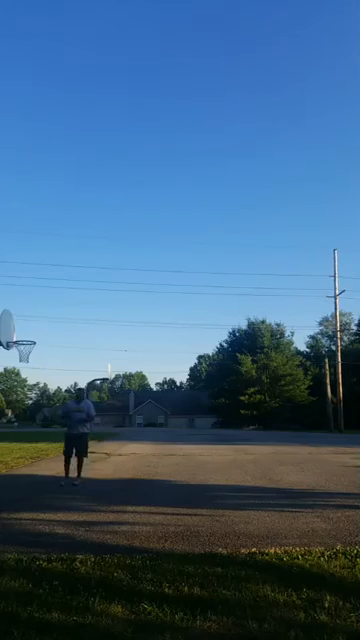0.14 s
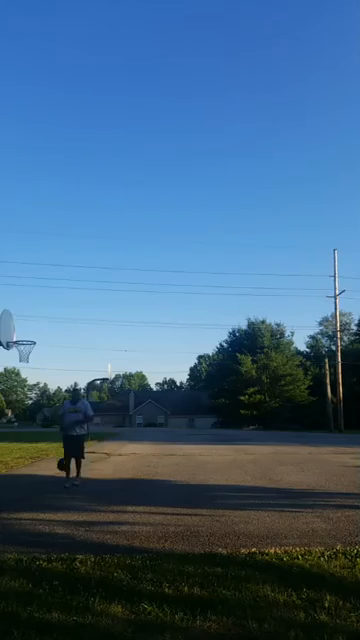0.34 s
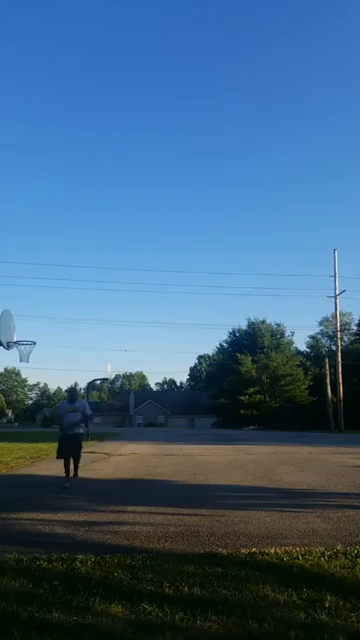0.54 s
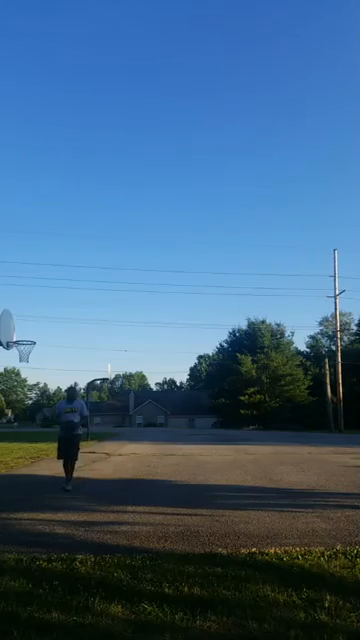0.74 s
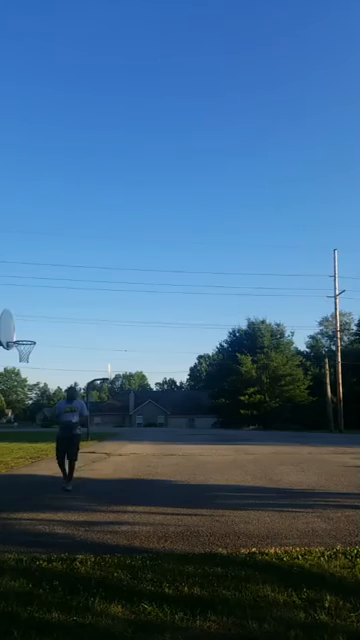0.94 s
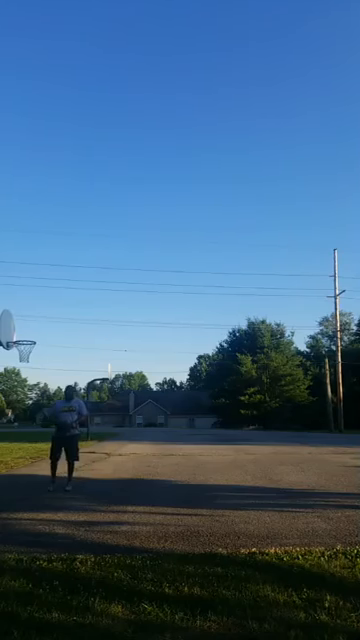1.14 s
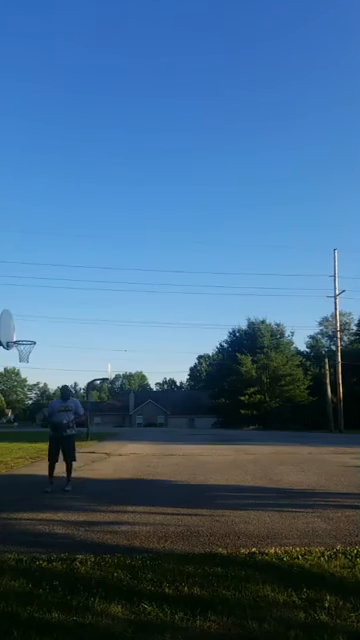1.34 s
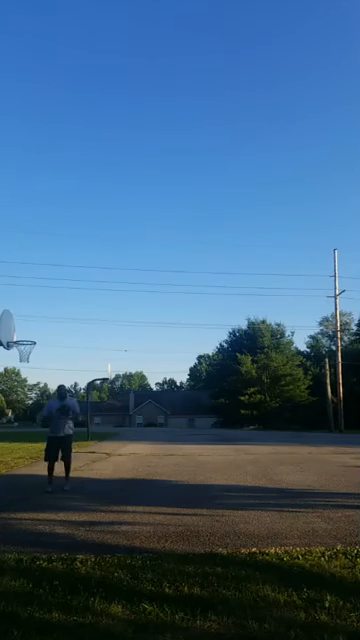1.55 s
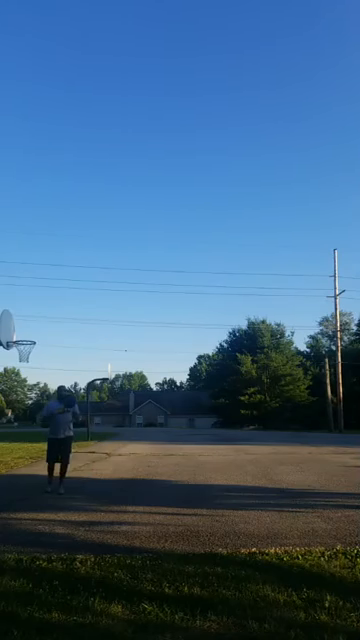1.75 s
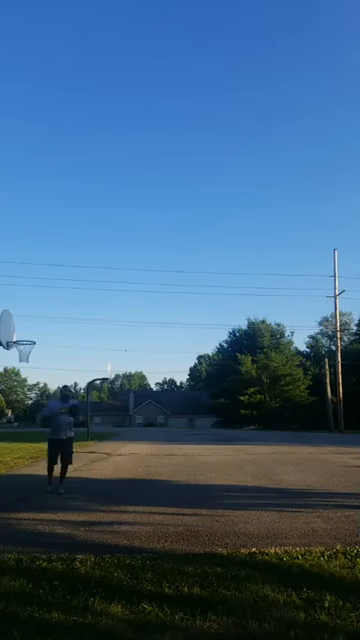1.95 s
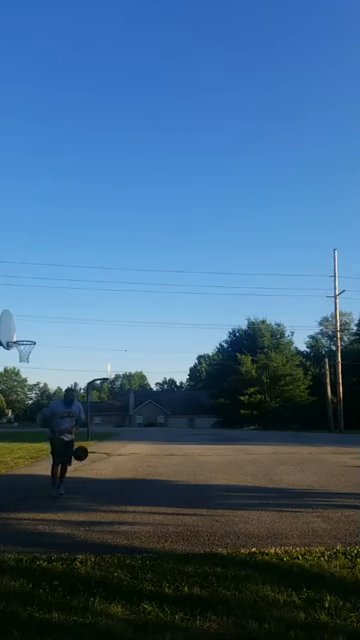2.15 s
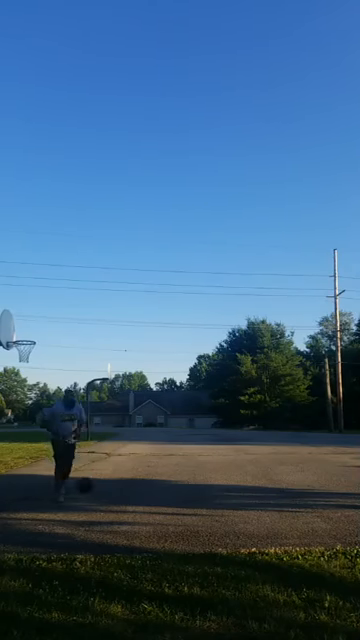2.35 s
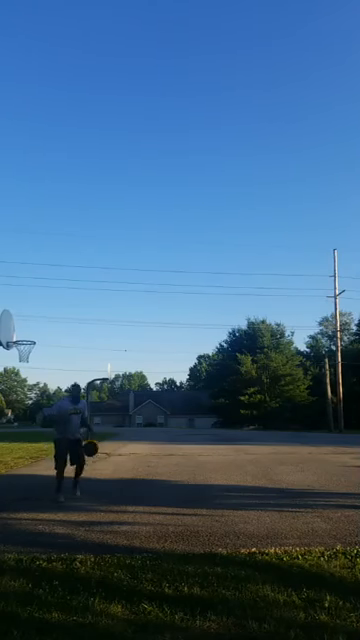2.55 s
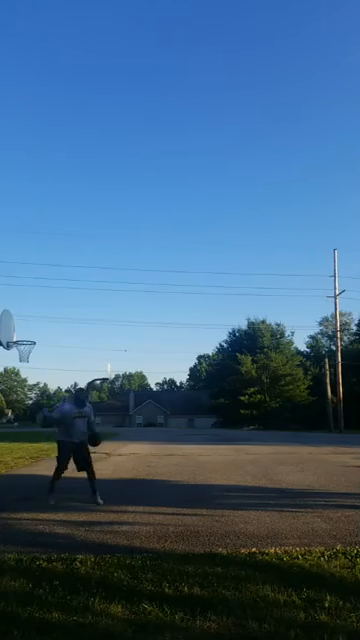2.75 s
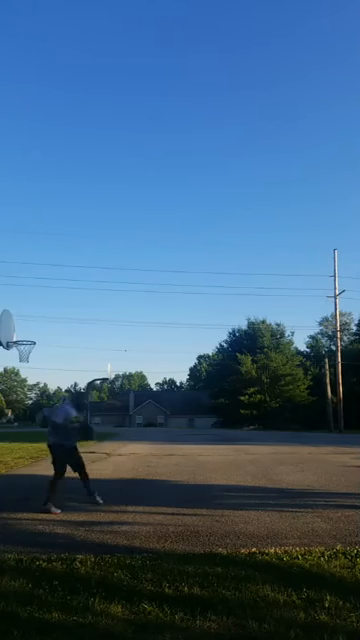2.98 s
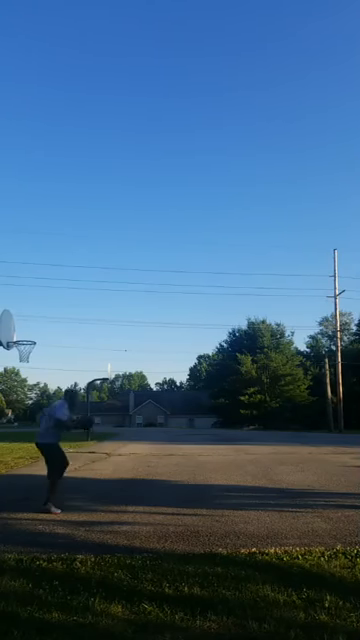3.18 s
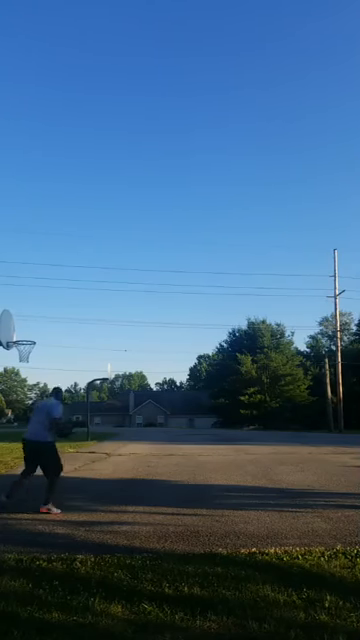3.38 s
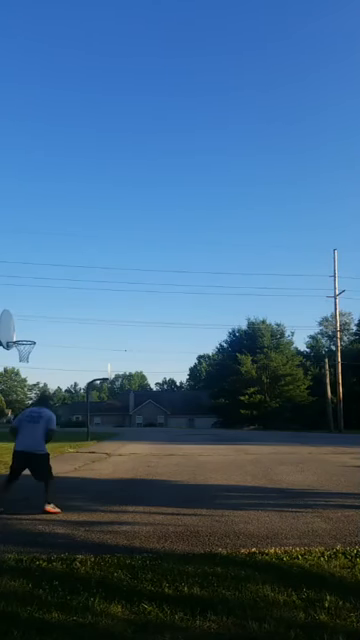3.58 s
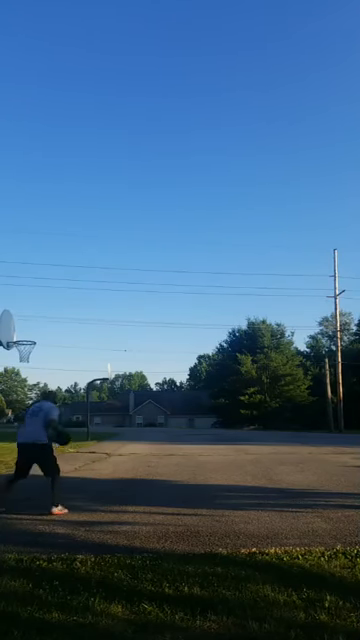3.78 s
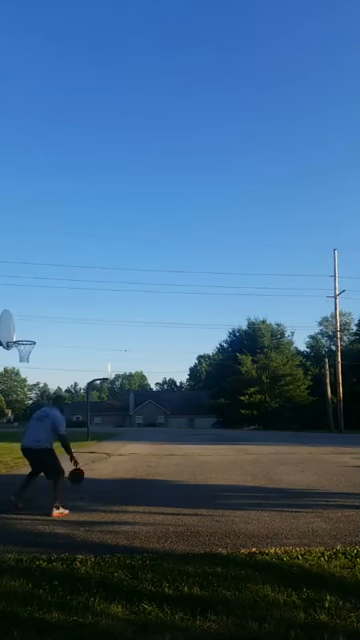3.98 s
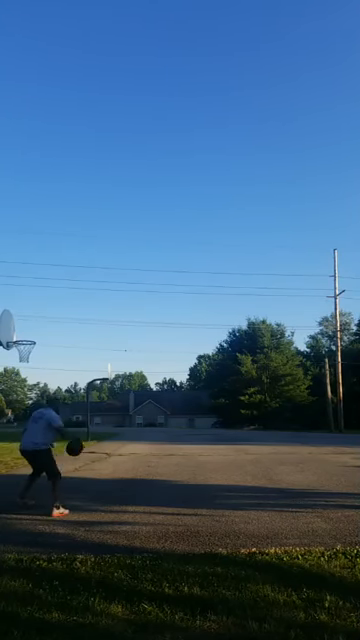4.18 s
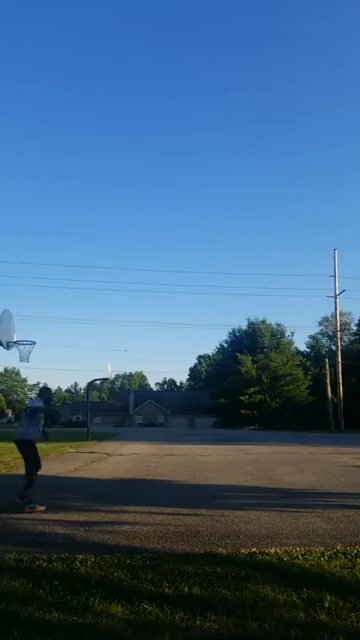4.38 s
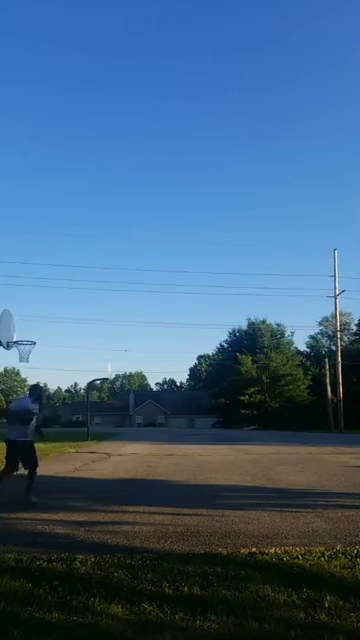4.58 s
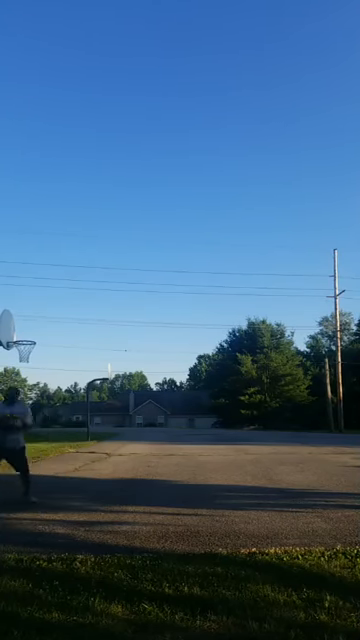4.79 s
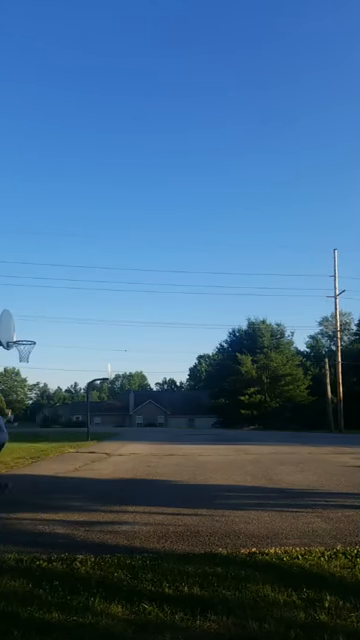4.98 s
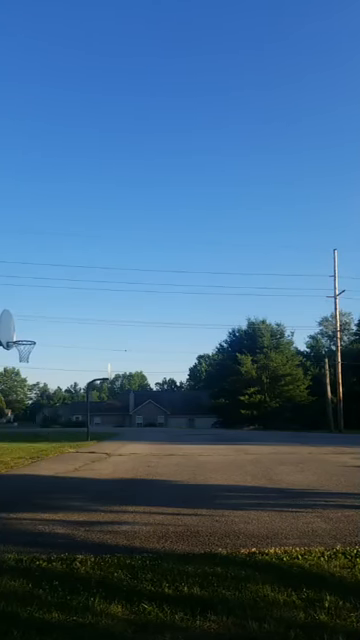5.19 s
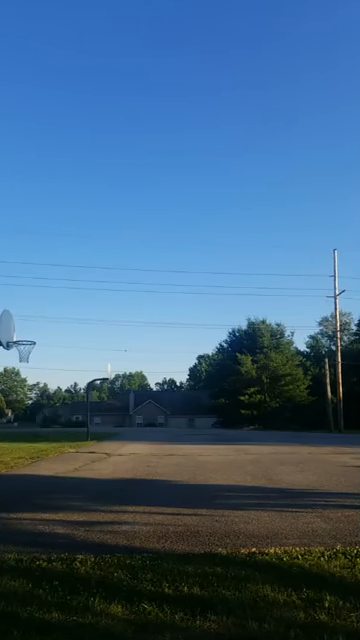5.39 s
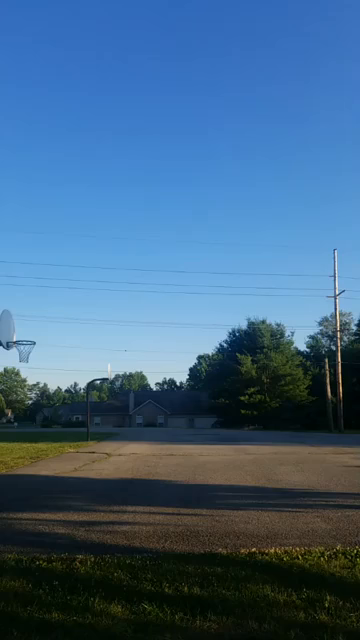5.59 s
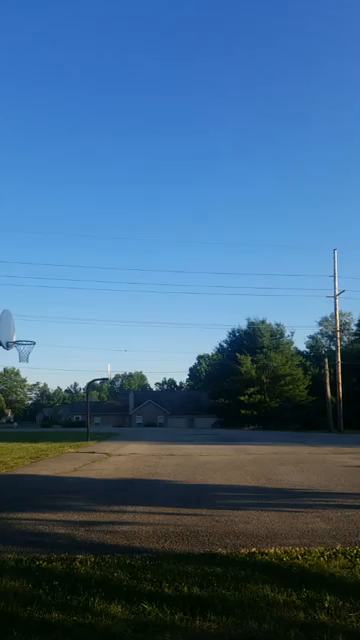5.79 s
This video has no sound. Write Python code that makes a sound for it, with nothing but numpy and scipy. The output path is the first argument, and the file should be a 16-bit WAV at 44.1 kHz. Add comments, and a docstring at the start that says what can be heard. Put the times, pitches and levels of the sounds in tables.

```python
"""A basketball dribbled on an open asphalt court, some metres from a phone standing in the grass.
Each of the three bounces thumps as the ball flattens, and its shell and the air inside ring briefly.
Between bounces, shoes scuff over loose grit, snap small stones, judder and stamp.
Far off, birds whistle and buzz over a traffic rumble and the hiss of leaves and insects.
Trees and houses send back faint echoes; a ground reflection and the mono microphone colour the sound."""
import sys
import numpy as np
from scipy import signal
from scipy.fft import rfft, irfft
from scipy.io import wavfile
from scipy.ndimage import uniform_filter1d

SR = 44100
rng = np.random.default_rng(int(sys.argv[2]) if len(sys.argv) > 2 else 0)


def dump_mix(stems):
    """Bounce the given channels to the path in sys.argv[1] as a 16-bit WAV at rate SR."""
    frames = np.atleast_2d(stems).T  # one column per channel
    limited = np.clip(frames, -1, 1)  # hard clip at full scale
    pcm = np.round(limited * 32767).astype(np.int16)
    wavfile.write(sys.argv[1], SR, pcm)


N = 257103
T = np.arange(N) / SR

# spectrum of loose grit on asphalt: f/Hz, level/dB
GRIT = [(300, -29.5), (900, -9.5), (1700, 10), (2800, 6), (4200, 2.5), (7000, -4.5), (14000, -22.5)]
# spectrum of a rubber sole's dull body: f/Hz, level/dB
SOLE = [(70, -14), (200, -2.5), (450, -5), (800, -1.5), (1200, -1.5), (2000, -4.5), (5000, -33)]


def undb(db):
    """Decibels to gain."""
    return 10 ** (np.asarray(db) / 20)


def unit(x):
    """Scale to rms 1."""
    return x / np.sqrt(np.mean(x ** 2))


def add(out, s, x):
    """Mix x into out from time s."""
    i = int(s * SR)
    out[i:i + len(x)] += x[:max(N - i, 0)]


def colour(x, points, tilt_db=0, size=8192):
    """Causal filter through (f/Hz, level/dB) points, tilted by tilt_db per octave around 3 kHz."""
    hz, db = np.transpose(points)
    octave = np.log2(np.fft.rfftfreq(size, 1 / SR) + 1)
    slope = tilt_db * np.clip(octave - np.log2(3000), -2, 2)
    gain = undb(np.interp(octave, np.log2(hz), db) + slope)
    # folding the cepstrum gives minimum phase
    cepstrum = irfft(np.log(gain))
    cepstrum[1:size // 2] *= 2
    cepstrum[size // 2 + 1:] = 0
    return signal.fftconvolve(x, irfft(np.exp(rfft(cepstrum))))[:len(x)]


def fade(t, t60):
    """Exponential decay, 60 dB down after t60 seconds."""
    return np.exp(-np.log(1000) * t / t60)


def ring(t, modes, tuning=1):
    """Damped sines that start together; tuning scales their frequencies."""
    return sum(undb(db) * fade(t, t60) * np.sin(2 * np.pi * hz * tuning * t) for hz, db, t60 in modes)


def walk(rate_hz):
    """Smooth random wander with rms 1."""
    hold = int(SR / rate_hz)
    steps = np.repeat(rng.standard_normal(N // hold + 1), hold)
    return unit(uniform_filter1d(steps, hold)[:N])


def grains(count, spread_db):
    """Dense tiny clicks, a few of them much larger than the rest."""
    sizes = undb(spread_db * np.minimum(rng.exponential(size=count), 5))
    return rng.standard_normal(count) * sizes * (rng.random(count) < 0.16)


def background(rumble_gain_db=4.5, hiss_gain_db=8, rumble_wander_db=0.94, hiss_wander_db=0.1):
    """Far traffic rumbles unevenly under the smooth hiss of leaves and insects."""
    # spectra of the traffic and the hiss: f/Hz, level/dB
    rumble_spectrum = [(20, -37), (40, -7), (65, -3), (120, 1), (170, -8.5), (230, -11.5), (320, -27),
                       (600, -25.5), (2000, -61)]
    hiss_spectrum = [(150, 4.5), (500, 7.5), (900, 5), (1700, 4.5), (2800, -4.5), (5000, 4.5), (7000, -6.5),
                     (9000, 4.5), (14000, -13)]
    # their rise and fall: t/s, level before gain/dB
    rumble_course = [(0.0, -60), (0.41, -59.5), (1.07, -62.5), (1.66, -62), (2.3, -57.5), (5.24, -59),
                     (5.83, -56.5)]
    hiss_course = [(0.0, -69.5), (0.28, -70.5), (0.5, -64), (0.89, -71.5), (1.59, -72.5), (1.88, -67.5),
                   (2.82, -66), (2.97, -62), (5.83, -68)]
    rumble_db = np.interp(T, *np.transpose(rumble_course)) + rumble_wander_db * walk(5.3)
    hiss_db = np.interp(T, *np.transpose(hiss_course)) - hiss_wander_db * walk(3.8)
    rumble = unit(colour(rng.standard_normal(N), rumble_spectrum))
    hiss = unit(colour(rng.standard_normal(N), hiss_spectrum))
    return undb(rumble_db + rumble_gain_db) * rumble + undb(hiss_db + hiss_gain_db) * hiss


def bird_buzzes(warble_hz=260, depth_rad=1.1):
    """A rapid warble of pitch splits each call into a stack of close lines that glide together."""
    # short buzzy calls: middle t/s, length/s, centre f/Hz, level/dB, rise/(Hz per s)
    calls = [(0.135, .08, 4730, -63, 11000), (0.273, 0.06, 5340, -57, 6000.5), (0.403, 0.089, 4270, -62, 0),
             (1.973, 0.16, 4070, -63, 1798)]
    out = np.zeros(N)
    for s, length, hz, db, rise in calls:
        on = abs(T - s) < length / 2
        t = T[on] - s
        glide = 2 * np.pi * (hz + rise * t / 2) * t
        warble = depth_rad * np.sin(2 * np.pi * warble_hz * t)
        out[on] += undb(db) * np.cos(np.pi * t / length) * np.sin(glide + warble)
    return out


def treetops(x, wet_db=-9, t60=1.35, build_s=0.036):
    """Foliage around the birds returns their song as a soft, late ring."""
    t = T[:SR]
    envelope = fade(t, t60) * np.minimum(t / build_s, 1)
    response = unit(rng.standard_normal(SR) * envelope) / np.sqrt(SR)
    return x + undb(wet_db) * signal.fftconvolve(x, response)[:N]


def scuffs(spread_db=3.5, swell_power=1.35):
    """A sole drags grit over the asphalt; pressure rises and falls, and the rubber adds a dull body."""
    # shoe slides: hardest pressure t/s, rise/s, fall/s, grit level/dB, tilt/(dB per octave)
    slides = [(.29, .04, 0.057, -56.5, 4.5), (.775, 0.039, .025, -55.5, 5), (1.235, .006, .04, -53, 10),
              (1.275, 0.048, 0.027, -46, 6), (1.763, 0.0042, 0.025, -53.5, 1),
              (1.783, 0.021, 0.021, -47.5, 3), (2.284, 0.024, 0.015, -52, 6.5),
              (2.774, 0.011, 0.019, -38, .5), (2.915, 0.075, 0.057, -34, 3),
              (3.123, 0.054, 0.033, -31.5, -2.5), (3.48, 0.14, 0.081, -42, 2.5),
              (3.759, .02, .025, -49.5, 6), (3.838, 0.025, 0.023, -40, 3), (4.501, 0.0053, 0.1, -45.5, 1.5),
              (4.617, .017, 0.025, -39, 0.5), (4.69, 0.086, 0.071, -42, 10.5),
              (4.9, 0.091, 0.044, -47.5, 3.5), (5.137, 0.023, 0.082, -30, -6),
              (5.21, 0.058, 0.059, -40, 1.5), (5.296, 0.051, 0.024, -46.5, 3),
              (5.48, .049, 0.037, -50.5, 1.5), (5.82, 0.12, .04, -54.5, 1)]
    out, t = np.zeros(N), T[:SR // 3] - T[SR // 7]
    for s, rise, fall, db, tilt_db in slides:
        pressure = np.interp(t, [-rise, 0, fall], [0, 1, 0]) ** swell_power
        grit = unit(colour(grains(len(t), spread_db), GRIT, tilt_db))
        sole = unit(colour(grains(len(t), spread_db), SOLE))
        sole_db = -8.5 - 0.31 * tilt_db  # a light, bright brush has less body
        add(out, s + t[0], undb(db) * pressure * (grit + undb(sole_db) * sole))
    return out


def surroundings(x, tail_db=-26, tail_t60=1.3, build_s=0.048, echo_smear_s=0.003, echo_hz=1200):
    """Ground, trees and houses return smeared echoes, then a thin long tail."""
    # broad scatter off nearby ground and grass, then a later, bright airy wash: delay/s, smear/s, level/dB,
    # centre f/Hz
    scatter = [(0.01, 0.018, -23, 805), (.055, 0.022, -23, 11100)]
    # echoes off houses and tree lines: delay/s, level/dB
    echoes = [(0.065, -35), (0.138, -36.5), (0.152, -51), (0.212, -46), (.265, -57.5), (0.319, -46)]
    # tail spectrum, raised at 1.2 kHz to cancel the dip applied in record(): f/Hz, level/dB
    tail_spectrum = [(80, -8.5), (250, -5.5), (700, -10.5), (950, -1.5), (1200, 11.5), (1700, -9),
                     (2300, 4), (3000, 0), (6000, -5.5), (14000, -2.5)]
    t = T[:SR]
    tail = colour(rng.standard_normal(SR), tail_spectrum) * fade(t, tail_t60)
    response = undb(tail_db) * unit(tail * np.minimum(t / build_s, 1))
    reflections = scatter + [(delay, echo_smear_s, db, echo_hz) for delay, db in echoes]
    for delay, smear, db, hz in reflections:
        band = [(hz / 8, -12), (hz / 2, -6), (hz, 0), (hz * 1.5, -11), (hz * 6, -20)]
        burst = rng.standard_normal(SR) * np.exp(-((t - delay) / smear) ** 2)
        response += undb(db) * unit(colour(burst, band))
    return signal.fftconvolve(x, response / np.sqrt(SR))[:N]


def snap(body_db, t60=0.011, rise_s=0.0009):
    """A short crackle with a dull body, as of one stone slipping under a sole; peak 1."""
    # spectrum of a stone's click: f/Hz, level/dB
    spectrum = [(300, -27), (900, -18.5), (1800, 5), (3000, 8), (4200, 2), (5500, -8), (7000, -7.5),
                (14000, -20.5)]
    t = T[:SR // 30]
    burst = rng.standard_normal((2, len(t))) * fade(t, t60) * (1 - np.exp(-t / rise_s))
    click = unit(colour(burst[0], spectrum)) + undb(body_db) * unit(colour(burst[1], SOLE))
    return click / np.max(abs(click))


def snaps(stones_per_s=140, jitter=0.25, scatter_db=3.0, max_stones=12):
    """Sharp clicks come singly, or in a quick uneven run as a hard push-off crushes stones."""
    # single sharp clicks: stones underfoot, and perhaps a hand catching the ball at 4.24 s
    # t/s, peak/dB, body relative to click/dB
    singles = [(.3, -27, -1), (2.7559, -29.5, 11), (2.9219, -13, -22), (3.836, -25.5, -25),
               (4.243, -24, -3.5), (5.1285, -17, -2), (5.0642, -40, -22), (5.305, -25.5, -25),
               (5.437, -38.5, -23)]
    # runs of stones: t/s, length/s, starting peak/dB, ending peak/dB, body relative to click/dB
    runs = [(3.105, 0.04, -13, -18, 5), (5.136, .05, -25, -28, -20)]
    out = np.zeros(N)
    for s, db, body_db in singles:
        add(out, s, undb(db) * snap(body_db))
    for s, length, first_db, last_db, body_db in runs:
        for k, (late, size) in enumerate(rng.standard_normal((max_stones, 2))):
            after = (k + jitter * late) / stones_per_s
            db = np.interp(after, [0, length], [first_db, last_db]) + scatter_db * size
            add(out, s + after, (after < length) * undb(db) * snap(body_db))
    return out


def whistle(length, from_hz, to_hz, db, trill=0, trill_hz=80.6, waver=0.0063, flutter_db=2.1):
    """One nearly pure note: it swells and fades while its pitch slides, fast at first, to a goal."""
    t = T[:int(length * SR)]
    settle = 1.3  # time constants in one slide
    slide = np.expm1(-settle * t / length) / np.expm1(-settle)
    bend = 1 + trill * np.sin(2 * np.pi * trill_hz * t) + waver * walk(212)[:len(t)]
    hz = (from_hz + (to_hz - from_hz) * slide) * bend
    phase = 2 * np.pi * np.cumsum(hz) / SR
    swell = np.sin(np.pi * t / length) ** 0.42
    level = undb(db + flutter_db * walk(82)[:len(t)])
    return np.sqrt(2) * level * swell * np.sin(phase)


def bird_whistles():
    """A songbird strings slurred notes into three phrases; a smaller bird chirps at a higher pitch."""
    # the smaller, farther bird: t/s, length/s, from f/Hz, to f/Hz, level/dB
    chirps = [(0.346, .038, 6830, 7380, -55.5), (0.388, .045, 7000, 7300, -63),
              (1.355, .035, 7050, 7670, -68), (1.652, 0.042, 5800, 5350, -65.5),
              (1.687, .05, 7900, 7300, -66), (1.791, 0.035, 5900, 6200, -60), (1.83, .035, 5970, 6300, -68)]
    # the nearer songbird: the same columns, then trill depth/share of pitch
    song = [(2.695, .04, 2440, 2520, -59, 0), (2.718, 0.03, 2580, 2980, -54.5, 0.011),
            (2.773, .09, 2640, 2510, -50, 0), (2.857, 0.064, 2390, 2270, -43.5, 0),
            (3.277, 0.08, 3650, 2940, -44.5, 0.0049), (3.338, .012, 2980, 3520, -45, 0.0034),
            (3.347, .105, 2846, 2110, -42, 0), (3.496, 0.066, 2230, 2760, -46, 0.022),
            (3.91, 0.026, 3970, 2840, -45, 0.037), (3.935, 0.06, 2500, 2570, -44.5, 0.074),
            (3.982, 0.029, 2540, 2590, -41.5, 0), (4.01, 0.062, 3260, 3110, -41.5, 0.00031),
            (4.077, .055, 2700, 2246, -42.5, 0), (4.126, 0.048, 2636, 2830, -44.5, .02)]
    out = np.zeros(N)
    for s, *note in song + chirps:
        add(out, s, whistle(*note))
    return out


def basketball(thump_t60=0.098, flex_rise_s=0.0015, crack_t60=0.02, ping_hz=2880, ping_t60=0.0084,
               first_touch=0.59, spread_s=0.00089, peel_db=-33, spray_db=-37, spray_t60=0.28):
    """The ball flattens and springs back (thump); the slap sets shell and air ringing and crushes grit."""
    # bounces: t/s, overall gain/dB, thump/dB, thump f/Hz, flex/dB, crack/dB, contact/s,
    # ring tuning/ratio, ping/dB, send to the surroundings/dB
    bounces = [(0.4711, -10, -6.5, 98, 3, -3, 0.013, 1, -2.5, -1.5),
               (2.3504, -10.5, -1.5, 103, 10, -7, 0.0097, 0.98, 4, -2),
               (4.0871, -6, -1.5, 119, -7, -4.5, 0.012, 1.009, -4, 2)]
    # slow flexing of the shell: f/Hz, level/dB, t60/s
    flex_modes = [(267.4, -1, 0.021), (320, -12.5, 0.0093), (554, -13.5, 0.023)]
    # ring of the shell and the air inside: f before tuning/Hz, level/dB, t60/s
    ring_modes = [(800, -34, 0.051), (920, -16.5, 0.025), (1407, -15.5, 0.017), (1697, -0.5, .019),
                  (1880, -5, 0.023), (2250, -29.5, 0.0092), (3470, -4.5, 0.0016), (3950, -5.5, 0.01),
                  (5360, -26, 0.01), (6360, -23, 0.009)]
    # air in the ball singing on faintly after the blow: f/Hz, level/dB, t60/s
    cavity_modes = [(2720, -39.5, .35), (3800, -43.5, 0.22)]
    # spectrum of the crack on asphalt: f/Hz, level/dB
    crack_spectrum = [(200, -30), (600, 5.5), (1200, 9), (2300, 6.5), (3500, -2.5), (5000, -11),
                      (7000, -14.5), (14000, -28)]
    direct, sent, t = np.zeros(N), np.zeros(N), T[:SR // 3]
    # removes the offset and sub-bass left by cutting the thump short
    highpass = signal.butter(2, 55, "high", fs=SR, output="sos")
    for s, db, thump_db, thump_hz, flex_db, crack_db, contact, tuning, ping_db, sent_db in bounces:
        touching = np.exp(-(t / contact) ** 6)
        squash = 1 - np.exp(-t / flex_rise_s)
        thump = np.sin(2 * np.pi * thump_hz * t) * touching * fade(t, thump_t60)
        # the shell first moves inward, so its modes start with a rarefaction
        body = squash * (undb(thump_db) * thump - undb(flex_db) * ring(t, flex_modes))
        # the ping is the mode that depends most on which spot of the ball lands
        shell = ring(t, ring_modes + [(ping_hz, ping_db, ping_t60)], tuning) + ring(t, cavity_modes)
        crack = unit(colour(rng.standard_normal(len(t)), crack_spectrum)) * fade(t, crack_t60)
        # the contact patch widens over the first milliseconds
        patch = 1 - (1 - first_touch) * np.exp(-t / spread_s)
        slap = patch * (undb(crack_db) * crack - shell)
        # grit crackles as the rubber peels off, then patters back down
        peel = undb(peel_db) * np.exp(-((t - contact) / 0.0045) ** 2)
        spray = undb(spray_db) * fade(t, spray_t60) * (t > contact)
        grit = (peel + spray) * unit(colour(grains(len(t), spread_db=1.3), GRIT, tilt_db=0.5))
        blow = undb(db) * (signal.sosfilt(highpass, body) + slap + grit)
        add(direct, s, blow)
        add(sent, s, undb(sent_db) * blow)
    return direct, sent


def judder(start_s=2.853, length_s=0.038, slip_hz=660, db=-42, wobble=0.05, rough_db=3):
    """A rubber sole sticks and slips in uneven pulses as it starts to slide: a short, low squeak."""
    # spectrum of the squeak: f/Hz, level/dB
    spectrum = [(100, -20), (650, 5), (1300, -16), (3200, -20), (4500, -21), (6200, -6), (14000, -39)]
    out, t = np.zeros(N), T[:int(length_s * SR)]
    hz = slip_hz * (1 + wobble * walk(300)[:len(t)])
    cycles = np.floor(np.cumsum(hz) / SR)
    slips = np.diff(cycles, prepend=0) * undb(rough_db * walk(500)[:len(t)])
    swell = np.sqrt(np.sin(np.pi * t / length_s))
    add(out, start_s, undb(db) * swell * unit(colour(slips, spectrum)))
    return out


def stomp(slap_at_s=0.00095, slap_width_s=0.0011):
    """The sole slaps flat on the asphalt and its cushion gives a hollow knock."""
    # a shoe planted hard: t/s, overall gain/dB, slap/dB
    plants = [(2.9502, -20, -0.5)]
    # modes of cushion and sole: f/Hz, level/dB, t60/s
    shoe_modes = [(242, 1.5, 0.022), (474, -5.5, 0.067), (732, -8, 0.033), (793, 3, 0.016),
                  (1790, 10.5, 0.012)]
    out, t = np.zeros(N), T[:SR // 10]
    for s, db, slap_db in plants:
        contact = np.exp(-((t - slap_at_s) / slap_width_s) ** 2)
        slap = contact * unit(colour(rng.standard_normal(len(t)), GRIT, tilt_db=7.0))
        knock = ring(t, shoe_modes) * (1 - np.exp(-t / slap_at_s))
        add(out, s, undb(db) * (knock + undb(slap_db) * slap))
    return out


def treads(spread_db=1.5, attack_s=0.0009):
    """A sole rolls down onto the asphalt with a dull, short patter."""
    # soft footfalls: t/s, length/s, level/dB
    footfalls = [(3.086, 0.013, -29.5), (4.751, 0.017, -36.5)]
    out, t = np.zeros(N), T[:SR // 20]
    for s, length, db in footfalls:
        pressure = (1 - np.exp(-t / attack_s)) * np.exp(-(t / length) ** 2)
        patter = unit(colour(grains(len(t), spread_db), SOLE))
        add(out, s, undb(db) * pressure * patter)
    return out


def scene():
    """The player is some metres from the microphone and fairly dry; the birds are far and diffuse."""
    bounces, sent = basketball()
    shoes = stomp() + treads() + scuffs() + judder() + snaps()
    echoes = surroundings(sent + shoes)
    birds = treetops(bird_whistles() + bird_buzzes())
    return (bounces + shoes + echoes + birds + background())[None]


def record(dry, top_hz=14200):
    """The phone in the grass: ground reflection and microphone colour the sound, and the top is cut."""
    # overall colour, ground-reflection dip near 1.2 kHz, microphone dip near 9 kHz: f/Hz, level/dB
    overall_colour = [(15, -18.5), (50, -5), (100, -2.5), (950, -2), (1250, -13), (1600, -0.5), (1900, -1),
                      (2300, -4.5), (2900, 0.5), (4200, -2), (5300, -4.5), (6900, 0.5), (7600, -12.5),
                      (8600, -26.5), (10200, -22), (11600, -8), (14000, -4)]
    coloured = np.array([colour(channel, overall_colour) for channel in dry])
    lowpass = signal.ellip(8, 0.2, 70, top_hz, fs=SR, output="sos")
    return signal.sosfilt(lowpass, coloured)


dry = scene()
out = record(dry)
dump_mix(out)
```